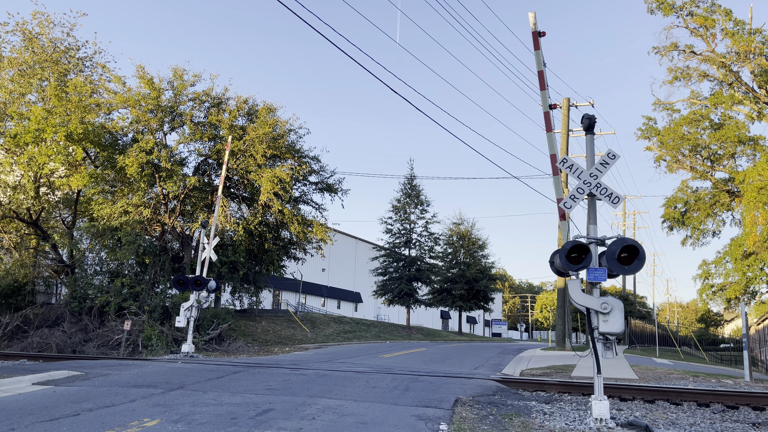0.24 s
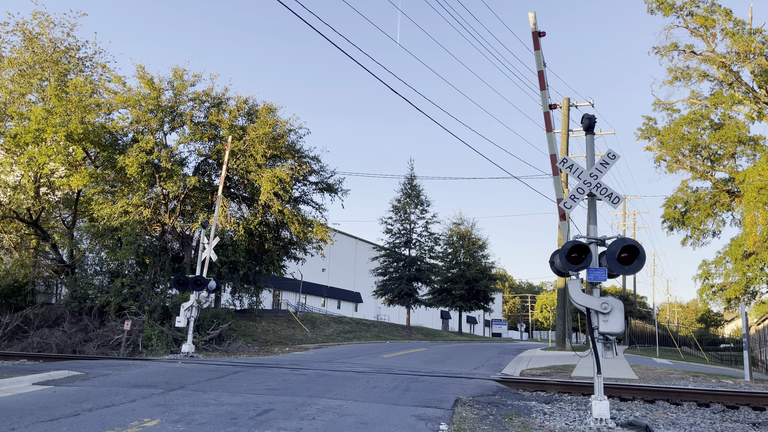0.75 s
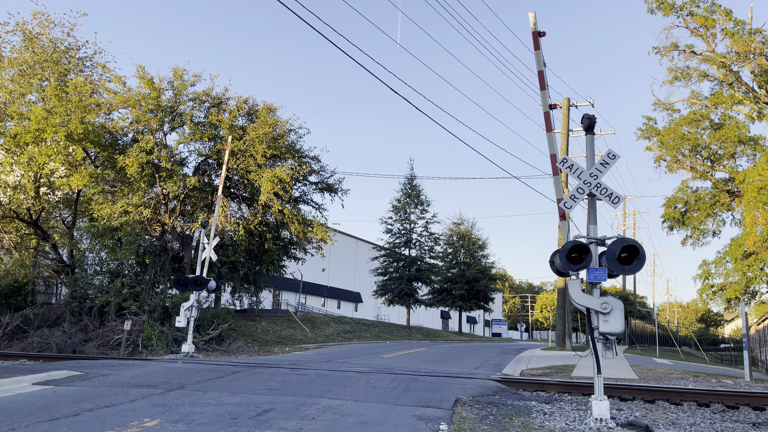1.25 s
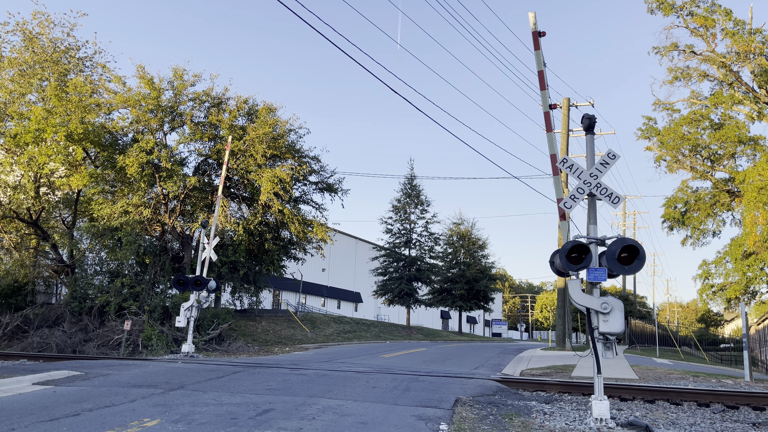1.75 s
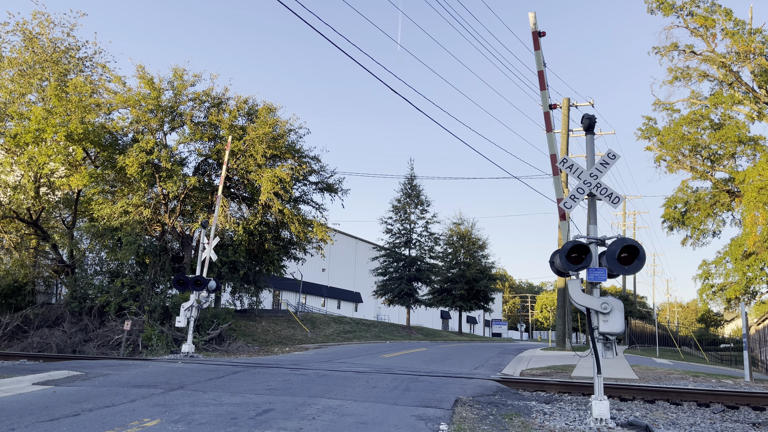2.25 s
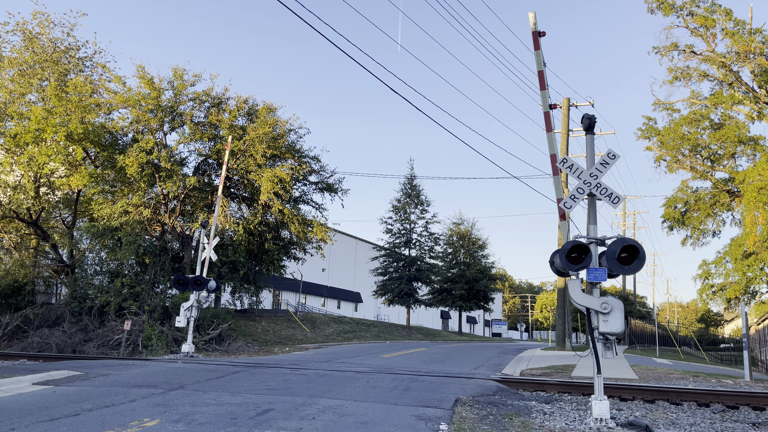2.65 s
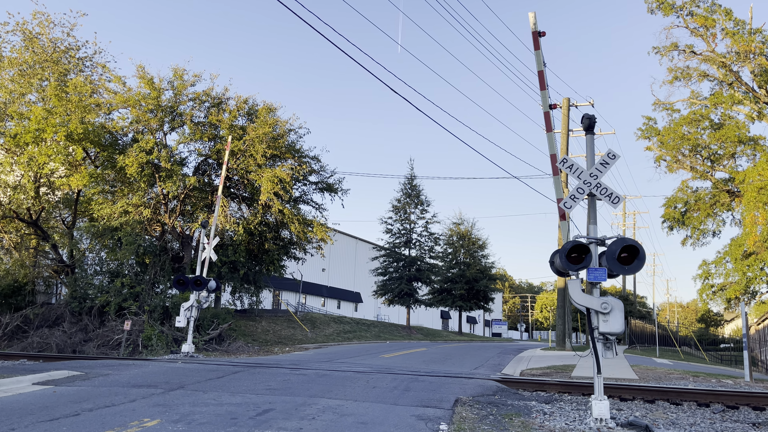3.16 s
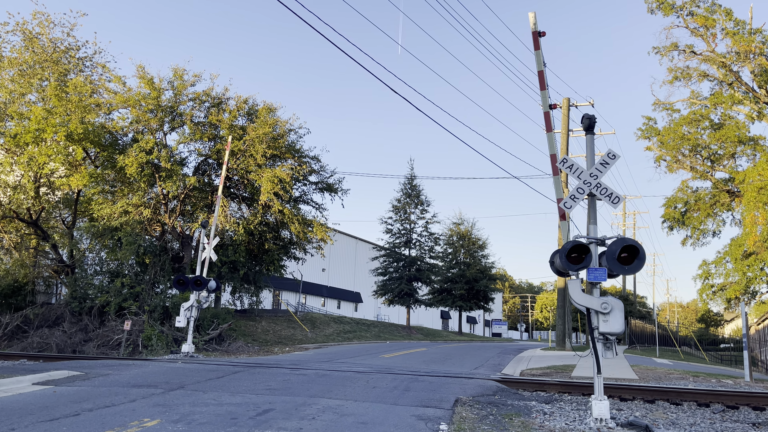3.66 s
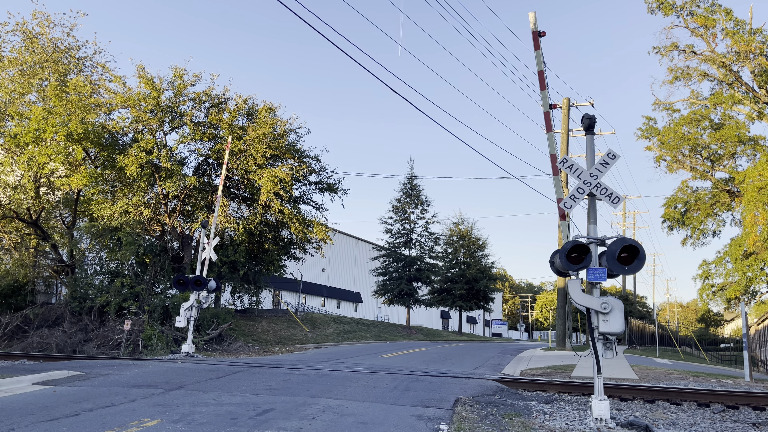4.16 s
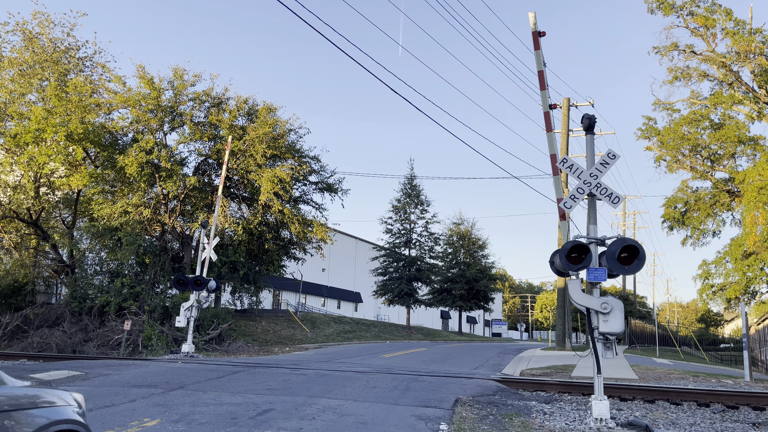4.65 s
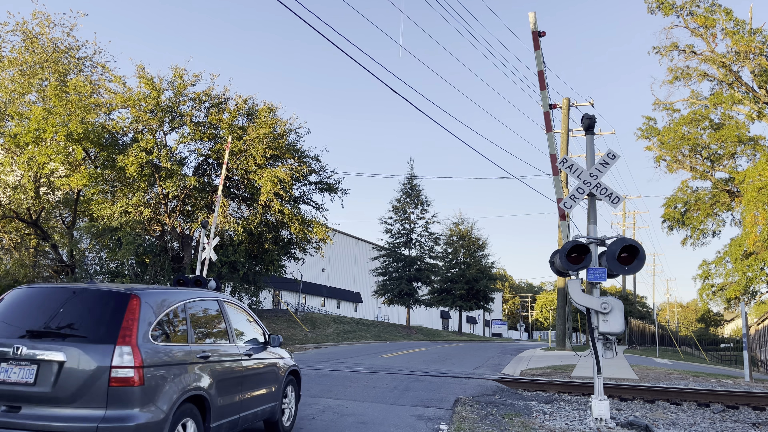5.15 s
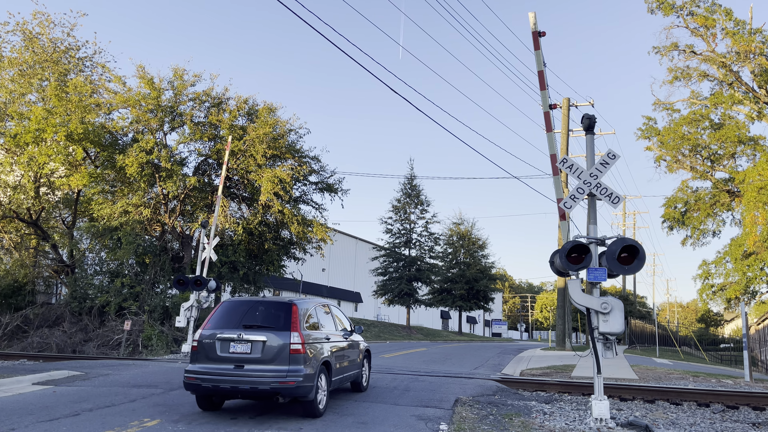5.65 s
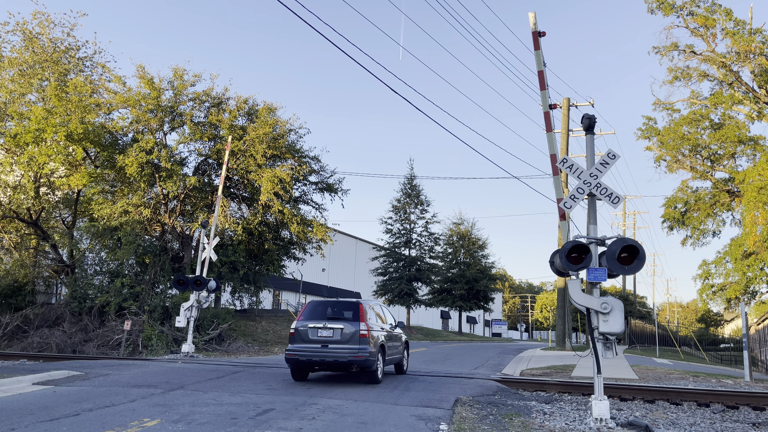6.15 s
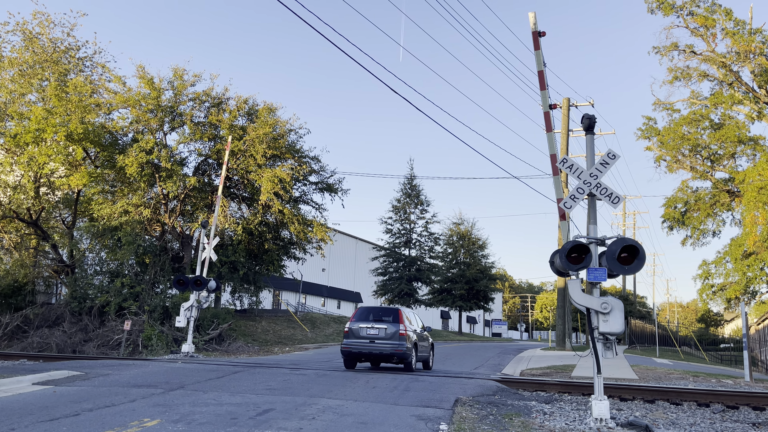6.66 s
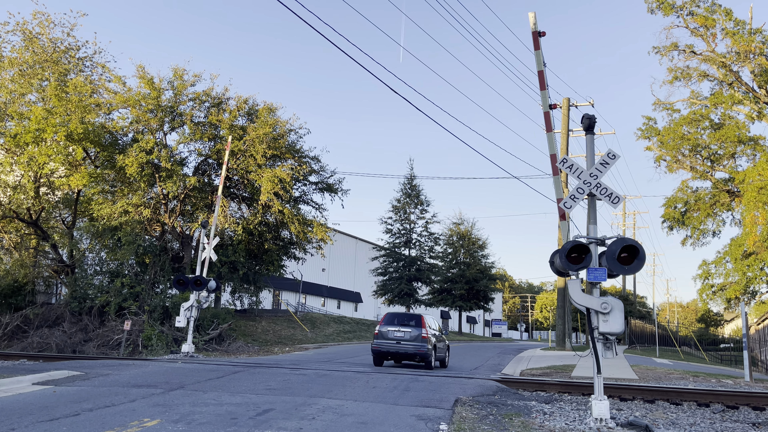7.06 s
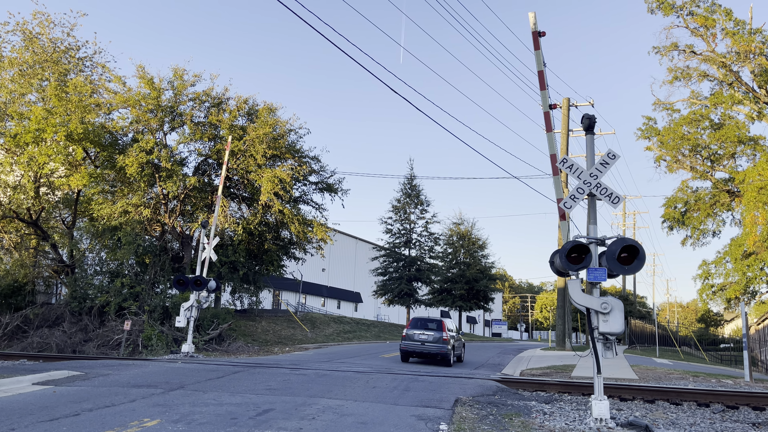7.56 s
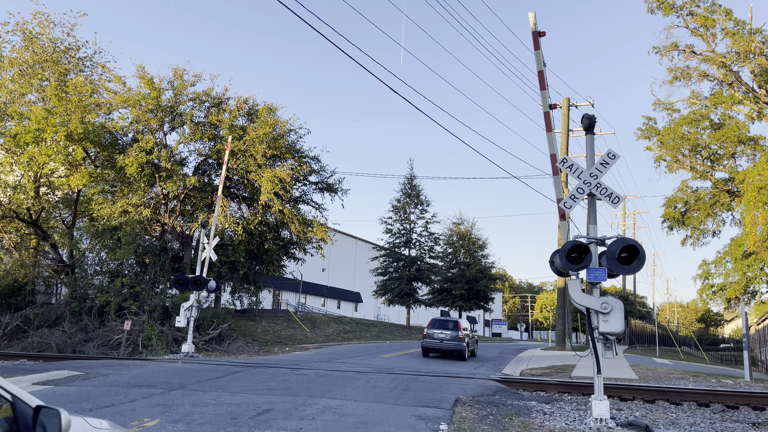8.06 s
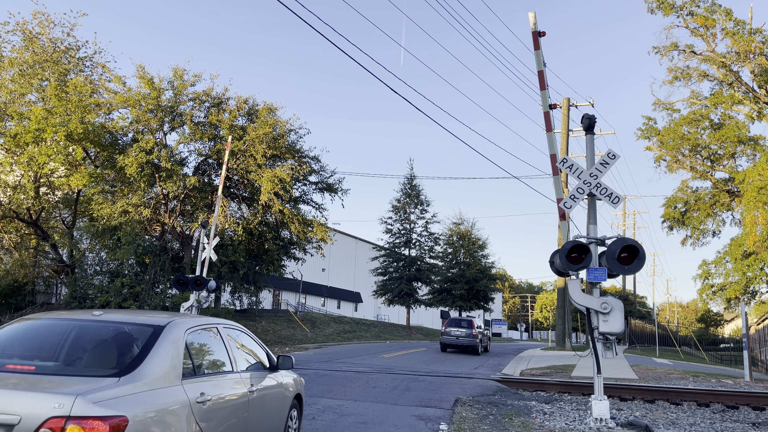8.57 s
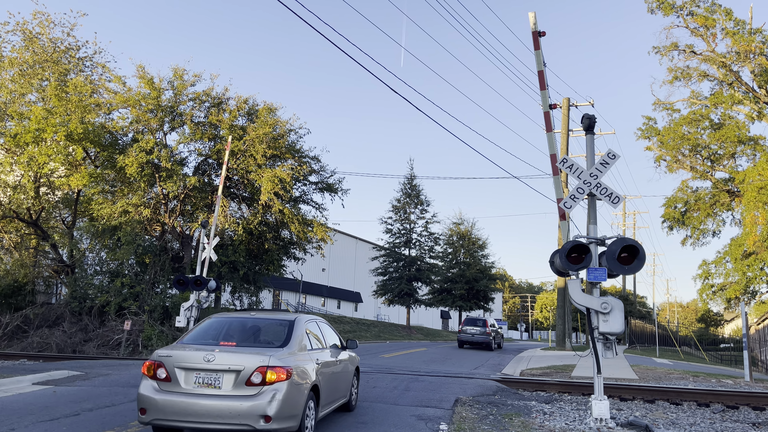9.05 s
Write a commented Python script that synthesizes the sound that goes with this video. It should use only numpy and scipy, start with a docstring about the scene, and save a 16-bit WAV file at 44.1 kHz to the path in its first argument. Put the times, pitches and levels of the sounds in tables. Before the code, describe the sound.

Outdoors beside a level crossing, a low, wavering drone of far engines and faint traffic. A car swells up from the left, tyres hissing and roaring, then recedes ahead and knocks over the rails in a quick cluster of dull thumps. A second, slightly louder car follows from the left, and a small bird gives brief faint whistles at the end. Hand-held stereo microphone close to the road.

```python
"""Two cars roll past a level crossing from the left, one after the other; the first thumps over the rails.
Behind them far engines drone, bands of noise swell briefly, small stones tick and a bird whistles.
Road noise is filtered noise that follows distance and bearing; engines are sums of wavering sines.
Thumps, pops and stones are decaying rings; the bird is gliding sines.
A hand-held recorder with two ports listens from the roadside."""
import sys
import numpy as np
from scipy import signal
from scipy.fft import rfft, irfft, next_fast_len
from scipy.io import wavfile
from scipy.ndimage import map_coordinates

SR = 44100
rng = np.random.default_rng(int(sys.argv[2]) if len(sys.argv) > 2 else 0)


def to_wav(sig):
    """Store sig (one row per channel, or 1-D mono) as 16-bit WAV at the path in sys.argv[1].

    Samples outside -1..1 are clipped; the rate is SR.
    """
    pcm = np.clip(np.atleast_2d(sig), -1, 1) * 32767
    pcm = np.round(pcm).astype(np.int16)
    wavfile.write(sys.argv[1], SR, pcm.T)  # frames by channels


N = 410571   # length in samples

# cars passing: (time nearest [s], level re zone [dB], time to roll the kerb distance [s], extra boom [dB])
PASSES = [(4.6, 0.74, 0.67, 1.9), (8.0, 1.62, 0.54, 1)]
# rumble, body boom, tyre roar, hiss, grit sizzle: (far traffic level [dB], car at its loudest [dB],
# loudest after nearest [s], spreading loss coming [1 = point source], spreading loss going [same])
ZONES = [(-41.5, -57, 0.17, 4.5, 1.7), (-47, -41.5, 0.11, 1.64, 1.28), (-43.5, -35, -0.24, 1.26, 1.43),
         (-76.5, -55.5, -0.11, 1.194, 1.16), (-91.5, -54, -0.021, 3.74, 1.43)]
# relative colour of road noise at each port: (frequency [Hz], left [dB per Hz], right [dB per Hz])
ROAR_COLOUR = [(22, 0, 2.5), (36, 0.5, 0), (48, 7, -1), (75, 6, 5.5), (105, 0.5, 1), (141, 4.5, 0.5),
               (181, 4, 2.5), (260, 2.5, 2), (550, -0.5, -1), (756, 1, 0), (910, 3, 3), (1130, -1.5, -1.5),
               (1600, -2, -2.5), (1770, -5, -3), (2070, -11, -9), (3440, -20, -18), (3780, -24, -23),
               (4950, -27.5, -29.5), (6900, -30, -32.5), (6770, -43.5, -33), (7600, -38, -37),
               (8500, -45, -37), (11480, -35, -41.5), (11300, -50.5, -43.5), (12500, -65, -56)]
# cross-fades between rumble/boom/roar/whine/hiss/air/sizzle: (from [Hz], to [Hz])
ZONE_EDGES = [(130, 175), (380, 616), (1800, 2600), (3300, 4570), (6900, 10400), (8600, 9500)]
# the two ports: (frequency [Hz], sound common to both [share], left leads beyond the bearing [rad])
PORTS = [(30, .99, .05), (130, .97, .25), (280, .9, .5), (500, .8, 1.2), (1500, .7, 0.), (5000, .6, 0.),
         (8600, .55, 0.), (9300, .92, -1.2), (10170, .98, -np.pi), (11400, .97, -5.5),
         (12500, .99, -2 * np.pi)]
# tread whine of the cars over far traffic: (time [s], level [dB], left-right [dB])
TREAD_WHINE = [(0, -60, 6), (.7, -60, 6.5), (1.37, -60.5, 8.5), (2.3, -61, 6), (2.9, -57.5, 5),
               (3.5, -56.5, 8), (4, -53, 5), (4.45, -49.5, 7), (4.95, -51, 6), (5.4, -51.5, 4),
               (5.9, -53, 6.5), (6.35, -55.5, 4), (6.7, -53, 5), (7.15, -57, 8), (7.55, -50, 4.5),
               (7.86, -48.5, 6), (8.05, -52.5, 6), (8.25, -48.5, 5.5), (8.7, -53, 4), (9.31, -52.5, 5)]

# set by the bearing: (far traffic, car coming on the left, car going ahead), units as named
LEAD_MS = (0.19, 0.4, 0.066)   # [ms] the left port hears it first
ECHO_MS = (1.45, 1.08, 1.22)   # [ms] wait for the echo off the road
ECHO_SHARE = (0.025, 0.02, 0.49)   # [amplitude share]
ROAR_PAN_DB = (2.5, 5, 5)   # [dB] left-right
HISS_PAN_DB = (8.5, 11, 6.5)   # [dB] left-right
# a second echo, turned over, combs the hiss at the left port: [amplitude share], then the band it combs (low
# [Hz], high [Hz]); below, its delay [ms]
COMB_SHARE, COMB_HZ = (.15, .3, .35), (4000., 7000.)
COMB_MS = (1.157, 1.11, 1.18)
COMB_GONE_BEFORE_S, COMB_GONE_HALF_S = .15, .4   # it fades while a car is close
SWING_AFTER_S, SWING_S = 0.28, 0.43   # a car swings from left to ahead
LOUDEST_RULES = 1.22   # over 1: the loudest source sets the bearing more than its share of power

# the first car shudders over the rails; levels of rumble and boom
SHUDDER_S, SHUDDER_HALF_S, SHUDDER_DB = 6.54, 0.51, (-40.5, -39.5)
# tyres knock on the rail edges: (time [s], level before the common drop [dB], brightness [dB per octave])
RAIL_KNOCKS = [(5.598, -25.5, -4), (5.922, -23, -2.5), (6.204, -20, 3), (6.243, -17, 1.2),
               (6.279, -22.5, 1.5), (6.417, -25.5, 5), (6.438, -19, -1.5), (6.487, -20.5, 4),
               (6.566, -20, -3), (6.581, -26, 5), (6.606, -15, 0.5), (6.636, -20, 1.5), (6.784, -20, -1),
               (6.796, -21, 1), (6.851, -22.5, 3)]
# the tyre's ringing: (frequency [Hz], relative level [dB], t60 [s])
TYRE_MODES = [(179, -3, 0.06), (245, -2, 0.052), (335, 4.5, 0.02), (466, -5.5, 0.0276), (650, -14, 0.044),
              (844, -8, 0.026), (1030, -10, 0.012), (1420, -7, 0.012), (1720, -15, 0.0094),
              (2330, -19, .008)]
# wheels thud down: (time [s], level before the common gain [dB], frequency [Hz], t60 [s])
WHEEL_THUDS = [(5.628, -16, 75, 0.043), (6.2554, -8, 130, 0.032), (6.288, -12, 111, 0.057),
               (6.438, -14.5, 130, 0.057), (6.487, -16, 108, 0.053), (6.607, -15.5, 105, 0.25),
               (6.6445, -21, 91, 0.18), (6.8011, -17, 127, 0.035), (6.834, -14, 96, 0.052)]
THUMP_LEAD_MS = 0.13   # the left port hears the thumps first
# single dry pops under a tyre: (time [s], level before the soft onset [dB], frequency [Hz], t60 [s],
# left-right [dB], left leads [ms])
TYRE_POPS = [(3.7515, -17, 900, .006, 9, .4), (5.581, -17, 700, .009, 2, .1),
             (9.2545, -22, 1250, .005, 3, .1)]
# stones flicked by tyres: (time [s], nominal level before the common gain [dB], frequency [Hz], t60 [s],
# left-right [dB])
FLICKED_STONES = [(.4, -49, 5900, 0.011, 18), (.4, -54, 6800, 0.011, 12), (.4, -51, 5000, .011, 12),
                  (.4, -55, 7900, .011, 9), (.4, -57, 9200, .011, 6), (.556, -60, 8000, .011, 10),
                  (.556, -65, 9200, .011, 8), (5.897, -35, 10900, 0.009, -2),
                  (5.897, -40, 9270, 0.0076, -4), (5.995, -42, 10980, 0.011, 0),
                  (6.015, -43, 11000, .01, 0), (6.192, -41, 11020, 0.021, 0), (6.43, -48, 11300, 0.034, 0),
                  (6.55, -42, 10700, 0.018, 0), (6.811, -47, 10900, .025, 0)]
TICK_SPREAD, TICK_RAGGED = 0.031, .3   # pitch spread of its rings, share; their scatter in time, share of t60

# engines and hums: (time [s], reference pitch [Hz], reference level [dB])
# their lines: (multiple of the reference pitch, level over the reference [dB])
FIRST_CAR = [(2.8, 126.8, -52), (3.5, 124.2, -42), (3.95, 122, -50), (4.15, 118.9, -39), (5.2, 110, -39.5),
             (5.5, 109.3, -46), (6.2, 101.6, -45)]
FIRST_ORDERS = [(1 / 3, -2.1), (0.99, 0)]
SECOND_CAR = [(7.3, 34.8, -50), (7.8, 33.07, -43), (8.4, 31.2, -43), (9.31, 31.5, -57)]
SECOND_ORDERS = [(1, 1)]
# a hum of the second car as it draws level: (time [s], pitch [Hz], level [dB])
SECOND_HUM = [(7.8, 80, -50), (8.1, 79, -36.5), (8.5, 77.9, -49), (8.85, 77, -44)]
# the far drone: (time [s], reference pitch [Hz], reference level [dB]), then its lines as above
DIESEL = [(0, 60.7, -45.5), (1.2, 60.7, -43), (1.7, 61.65, -39.5), (2.1, 60.6, -37.5), (3.27, 61.3, -44.5),
          (3.99, 61, -35.5), (5.5, 61.1, -38.5), (5.65, 59.66, -35), (7.45, 59.27, -41),
          (7.95, 61.8, -42.5), (8.17, 59.5, -36), (9.0, 59.8, -38.5), (9.31, 59, -41)]
DIESEL_ORDERS = [(.5, -22), (1, -1), (1.5, -10.5), (2, -15.5)]
# a second far engine, same columns
UPPER_DRONE = [(0, 87.5, -48), (.9, 87.5, -44), (1.7, 87, -45.5), (2.4, 86.5, -43.5), (3.1, 86, -48),
               (3.8, 85, -45), (4.6, 85, -50), (5.6, 85, -45), (6.6, 86, -53), (7.25, 88, -45.5),
               (7.7, 88, -61), (8.4, 88, -59), (9.31, 88, -48)]
UPPER_ORDERS = [(.6, -9), (1, 0), (1.2, -9), (1.6, -7), (2.4, -13)]
# a higher line of the drone that dies away early: (time [s], pitch [Hz], level [dB])
HIGH_HUM = [(0, 152.8, -51), (2.4, 152.8, -53), (2.8, 152.8, -58)]

# brief swells of noise: (middle [s], half length [s], level [dB], low [Hz], high [Hz], left-right [dB])
SWISHES = [(0.23, 0.038, -65.5, 3800, 6200, 5), (0.24, .035, -81, 8300, 11800, 0),
           (0.24, 0.57, -56, 180, 1030, 13), (3.636, 0.44, -52, 1260, 1795, 9),
           (4.55, 0.47, -51, 328.6, 700, -1), (4.03, 0.37, -68, 3100, 6100, -22),
           (7.35, 0.36, -62.5, 3100, 5300, -16), (5.47, 1, -46.5, 1176, 1633, -1),
           (6.62, 0.32, -64, 4200, 6300, 12.5), (7.22, 0.33, -61, 3800, 7400, 17),
           (7.202, 0.53, -45.5, 238, 286, 2), (5.24, 0.7, -53.5, 364, 567, 0.5),
           (8.63, 0.79, -45.5, 203, 297, 2), (7.9, 0.39, -43, 432, 600, 9.5),
           (7.3, 0.32, -51, 767, 1217, 7), (7.6, 0.32, -53.5, 880, 1050, 7),
           (4.56, 0.22, -60, 2100, 3100, 5), (4.55, 0.36, -62, 4100, 4700, 4),
           (3.74, 0.46, -57.5, 2720, 3620, 4), (7.26, 0.34, -60, 3000, 3660, 7),
           (8.34, 0.27, -45.5, 220, 426, -1), (4.8, 0.37, -48.5, 690, 970, 3)]
SWISH_ALIKE = 0.61   # share common to both ports
# a bird's whistles: (start [s], end [s], from [Hz], to [Hz], peak level [dB])
WHISTLES = [(8.538, 8.57, 2600, 3180, -54), (8.809, 8.828, 3900, 3000, -55),
            (8.862, 8.903, 2500, 3170, -52), (9.12, 9.149, 3950, 2750, -52),
            (9.176, 9.207, 2550, 3130, -50.5)]
GLIDE_EASES, LOUDEST_AT = 2.2, .65   # how soon a glide levels out; share of its length

LOW_CUT_HZ, CUTOFF_HZ = 26.5, 13000   # the recorder's range
STEP = 64   # samples between control values
CONTROL_S = np.arange(0, N + STEP, STEP) / SR


def road(flicker_db, air_db, air_share):
    """Tyre noise and its road echo reach the right port later and shadowed; level and bearing shape each band."""
    rumble, boom, roar, hiss, sizzle = traffic()
    whine, whine_pan = in_time(TREAD_WHINE)
    lead_ms, echo_ms, echo, roar_pan, hiss_pan = by_bearing(
        LEAD_MS, ECHO_MS, ECHO_SHARE, ROAR_PAN_DB, HISS_PAN_DB)

    # one noise common to both ports, one of the right port's own, each with its echo
    echo_band = signal.butter(1, [550., 3400.], "band", fs=SR)   # the echo colours only the mid range
    with_echo = []
    for noise in rng.standard_normal((2, N)):
        reflected = delayed(signal.filtfilt(*echo_band, noise), echo_ms)
        with_echo.append(noise + echo * reflected)
    common, own = with_echo

    size = next_fast_len(N)
    hz = np.arange(size // 2 + 1) * SR / size
    common, late, own = rfft(np.array([common, delayed(common, lead_ms), own]), size)
    fades = [at_hz([(low, 0), (high, 1)], hz)[0] for low, high in ZONE_EDGES]
    share, phase = at_hz(PORTS, hz)
    share = np.clip(share, 0, 1)
    arriving = late + fades[-1] * (common - late)   # the top octave comes to both sides through one port
    right = share * arriving * np.exp(-1j * phase) + np.sqrt(1 - share ** 2) * own
    pair = np.array([common, right]) * from_db(at_hz(ROAR_COLOUR, hz))

    air = air_share * sizzle + (1 - air_share) * hiss + air_db   # follows both hiss and sizzle
    levels = [rumble, boom, roar, whine, hiss, air, sizzle]
    pans = [.5 * roar_pan, 0.59 * roar_pan, roar_pan, whine_pan, hiss_pan, 1.4 * hiss_pan, 0 * roar]
    out = np.zeros((2, N))
    for below, above, level_db, pan_db in zip([1] + fades, fades + [0], levels, pans):
        zone = rms_one(irfft(pair * (below - above), size)[:, :N])
        flicker = flicker_db * drift(15.3)
        out += zone * from_db(level_db + flicker + np.outer([.5, -.5], pan_db))
    out[0] = combed(out[0])
    return out


def traffic():
    """Unrelated sounds add in power: far traffic, the passing cars and the shudder over the rails."""
    levels = []
    for k, (far_db, *car) in enumerate(ZONES):
        levels.append(power_sum(far_db, *cars_db(*car, booming=k == 1)))
    for k, db in enumerate(SHUDDER_DB):
        levels[k] = power_sum(levels[k], db + swell(SHUDDER_S, SHUDDER_HALF_S))
    return every_sample(levels)


def cars_db(near_db, after_s, coming, going, booming=False):
    """Each car's level falls with its distance along the road, unlike ahead and behind."""
    levels = []
    for nearest_s, db, kerb_s, boom_db in PASSES:
        since_loudest = CONTROL_S - nearest_s - after_s
        spreading = np.where(since_loudest < 0, coming, going)
        loss_db = spreading * 10 * np.log10(1 + (since_loudest / kerb_s) ** 2)
        levels.append(near_db + db + booming * boom_db - loss_db)
    return levels


def by_bearing(*quantities):
    """Each quantity as the sources set it, weighted by a power of their roar; cars swing from left to ahead."""
    far_db, *car = ZONES[2]
    weights = [from_db(2 * LOUDEST_RULES * (db - far_db)) for db in cars_db(*car)]
    gone = [.5 + .5 * np.tanh((CONTROL_S - s - SWING_AFTER_S) / SWING_S) for s, *_ in PASSES]
    curves = []
    for far, coming, going in quantities:
        from_cars = sum(w * (coming + (going - coming) * g) for w, g in zip(weights, gone))
        curves.append((far + from_cars) / (1 + sum(weights)))   # far traffic weighs 1
    return every_sample(curves)


def combed(left):
    """The hiss meets its own late, inverted copy, which cancels and reinforces it in turn up the band."""
    share, comb_ms = by_bearing(COMB_SHARE, COMB_MS)
    closeness = sum(from_db(swell(s - COMB_GONE_BEFORE_S, COMB_GONE_HALF_S)) for s, *_ in PASSES)
    close, = every_sample([closeness])
    band = signal.sosfiltfilt(signal.butter(2, COMB_HZ, "band", fs=SR, output="sos"), left)
    return left - share * (1 - close) * delayed(band, comb_ms)


def bumps(knock_drop_db, spread_db, cycles_late, ragged_s):
    """Each rail edge jolts the tyre's short modes three times, high ones tending first; the wheels thud down."""
    out = np.zeros(N)
    shape = (len(RAIL_KNOCKS), len(TYRE_MODES), 3)
    strength = rng.standard_normal(shape)
    wait = rng.random(shape) * [.45, 1, 2]
    for s, db, hz, t60 in WHEEL_THUDS:
        add(out, s, db, hz, t60, swell_s=0.0013, gain=-0.75)
    for (s, knock_db, tilt_db), strengths, waits in zip(RAIL_KNOCKS, strength, wait):
        for (mode_hz, db, ring_s), jolts, lates in zip(TYRE_MODES, strengths, waits):
            octaves = np.log2(mode_hz / TYRE_MODES[2][0])
            mode_db = knock_db + db + tilt_db * octaves - knock_drop_db
            for jolt, late in zip(jolts, lates):
                level_db = mode_db + spread_db * jolt - 3.6 * late   # waiting weakens a jolt
                at_s = s + cycles_late / mode_hz + ragged_s * late
                add(out, at_s, level_db, mode_hz, ring_s, swell_s=0.44 / mode_hz)
    return out


def pops():
    """One short decaying ring each, later and weaker at the right port."""
    out = np.zeros((2, N))
    for s, db, hz, t60, pan_db, lead_ms in TYRE_POPS:
        add(out[0], s, db + pan_db / 2, hz, t60, swell_s=.0002)
        add(out[1], s + lead_ms / 1000, db - pan_db / 2, hz, t60, swell_s=.0002)
    return out


def stones():
    """Short ticks: six close rings scattered in pitch and time, with the ports' phase between sides."""
    out = np.zeros((2, N))
    pitch = rng.standard_normal((len(FLICKED_STONES), 6))
    wait = rng.random((len(FLICKED_STONES), 6))
    for (s, db, hz, t60, pan_db), pitches, waits in zip(FLICKED_STONES, pitch, wait):
        sides = from_db([[pan_db / 2], [-pan_db / 2]]) / 2
        for ring_hz, late in zip(hz * (1 + TICK_SPREAD * pitches), waits):
            port_phase = at_hz(PORTS, ring_hz)[1] * np.array([[0], [1]])
            add(out, s + TICK_RAGGED * t60 * late, db, ring_hz, t60, swell_s=0.072 * t60,
                gain=sides, phase=port_phase)
    return out


def engine(rows, orders, waver_db, waver_rad):
    """Firing lines at multiples of a gliding pitch; each wavers in level and phase."""
    hz, level_db = in_time(rows)
    t = np.arange(N) / SR
    turn = 2 * np.pi * np.cumsum(hz) / SR
    # 0.2 s fades inside the span; one that starts at 0 is on at once and fades after its last row
    inside_s = np.minimum(t - rows[0][0], rows[-1][0] - t)
    heard = np.clip(inside_s / .2 + (rows[0][0] == 0), 0, 1)
    lines = np.zeros(N)
    for multiple, db in orders:
        loudness = from_db(db + waver_db * drift(1.4))
        lines += loudness * np.sin(multiple * turn + waver_rad * drift(3.0))
    return np.sqrt(2) * heard * from_db(level_db) * lines


def swishes():
    """Soft puffs: noise kept to one band rises and falls, partly alike at both ports."""
    out, white = np.zeros((2, N)), rng.standard_normal((2, N))
    white[1] = SWISH_ALIKE * white[0] + np.sqrt(1 - min(SWISH_ALIKE, 1) ** 2) * white[1]
    for s, half_s, db, low_hz, high_hz, pan_db in SWISHES:
        span = slice(max(int((s - 3 * half_s) * SR), 0), int((s + 3 * half_s) * SR))
        band = signal.butter(3, [low_hz, high_hz], "band", fs=SR, output="sos")
        noise = signal.sosfilt(band, white[:, span])
        gain, = every_sample([from_db(db + swell(s, half_s))])
        out[:, span] += rms_one(noise) * gain[span] * from_db([[pan_db / 2], [-pan_db / 2]])
    return out


def bird():
    """Pure glides that move fast at first and level out, loudest late."""
    out = np.zeros(N)
    for start_s, end_s, from_hz, to_hz, db in WHISTLES:
        way = np.linspace(0, 1, int((end_s - start_s) * SR))
        hz = to_hz + (from_hz - to_hz) * (1 - way) ** GLIDE_EASES
        loud = np.sin(np.interp(way, [0, LOUDEST_AT, 1], [0, np.pi / 2, np.pi]))
        tone = np.sin(2 * np.pi * np.cumsum(hz) / SR)
        start = round(start_s * SR)
        out[start:start + len(way)] = from_db(db) * np.sqrt(np.abs(loud)) * tone
    return out


def add(out, at_s, level_db, hz, t60, swell_s, gain=1, phase=0):
    """One blow sets a decaying sine ringing; a soft contact swells in."""
    start = round(at_s * SR)
    t = np.arange(min(int(t60 * SR), N - start)) / SR
    envelope = from_db(level_db - 60 * t / t60) * (1 - np.exp(-t / swell_s))
    out[..., start:start + len(t)] += gain * envelope * np.sin(2 * np.pi * hz * t - phase)


def delayed(x, ms):
    """Read a sound a changing number of ms late."""
    return map_coordinates(x, [np.arange(N) - ms * SR / 1000], order=3, mode="mirror")


def drift(rate):
    """Slow chance: noise through a double one-pole low-pass at rate Hz, spread 1."""
    r = np.exp(-80 * np.pi * rate / SR)   # one value every 40 samples
    noise = rng.standard_normal(N // 40 + 2002)
    slow = signal.lfilter([1], [1, -2 * r, r * r], noise)[2000:]   # drop the filter's start
    return np.interp(np.arange(N) / 40, np.arange(len(slow)), rms_one(slow))


def swell(middle_s, half_s):
    """A bell-shaped rise and fall in dB, 6 dB down at half_s either side."""
    return np.maximum(-6 * ((CONTROL_S - middle_s) / half_s) ** 2, -90)


def power_sum(*levels_db):
    """Level of unrelated sounds together."""
    return 10 * np.log10(sum(10 ** (db / 10) for db in levels_db))


def every_sample(controls):
    """Control values joined up to every sample."""
    return [np.interp(np.arange(N) / SR, CONTROL_S, c) for c in controls]


def in_time(rows):
    """Columns of a curve at every sample."""
    s, *columns = np.transpose(rows)
    return [np.interp(np.arange(N) / SR, s, c) for c in columns]


def at_hz(points, hz):
    """Columns of a spectrum at the given frequencies, joined on a log axis."""
    knots, *columns = np.transpose(points)
    return [np.interp(np.log(hz + 1), np.log(knots), c) for c in columns]


def rms_one(x):
    """Scale to rms 1."""
    return x / np.sqrt(np.mean(x ** 2) + 1e-20)


def from_db(db):
    """Decibels to gain."""
    return 10 ** (np.asarray(db) / 20)


def scene():
    """Road noise around the ports, engines and thumps a little to the left, a bird ahead."""
    thumps = bumps(knock_drop_db=6, spread_db=3.0, cycles_late=0.62, ragged_s=.0105)
    right_thumps = np.roll(thumps, round(THUMP_LEAD_MS * SR / 1000))
    thump_pair = [thumps, right_thumps] * from_db([[1.2], [-1.2]])
    cars = engine(FIRST_CAR, FIRST_ORDERS, waver_db=1.0, waver_rad=0.76)
    cars += engine(SECOND_CAR, SECOND_ORDERS, waver_db=1.5, waver_rad=.3)
    cars += engine(SECOND_HUM, [(1, 0)], waver_db=1.0, waver_rad=.3)
    drone = engine(DIESEL, DIESEL_ORDERS, waver_db=0.7, waver_rad=0.5)
    drone += engine(UPPER_DRONE, UPPER_ORDERS, waver_db=2.1, waver_rad=0.78)
    drone += engine(HIGH_HUM, [(1, 0)], waver_db=1.5, waver_rad=.3)
    engines = (drone + cars) * from_db([[.9], [-.9]])
    tyres = road(flicker_db=0.8, air_db=-8.0, air_share=0.24)
    return tyres + thump_pair + pops() + stones() + engines + swishes() + bird()


def record(dry):
    """The microphone drops the deepest bass steeply; the top is cut."""
    low_cut = signal.cheby2(6, 20, LOW_CUT_HZ, "high", fs=SR, output="sos")
    top_cut = signal.cheby2(20, 70, CUTOFF_HZ, fs=SR, output="sos")
    return signal.sosfilt(top_cut, signal.sosfilt(low_cut, dry))


dry = scene()
out = record(dry)
to_wav(out)
```